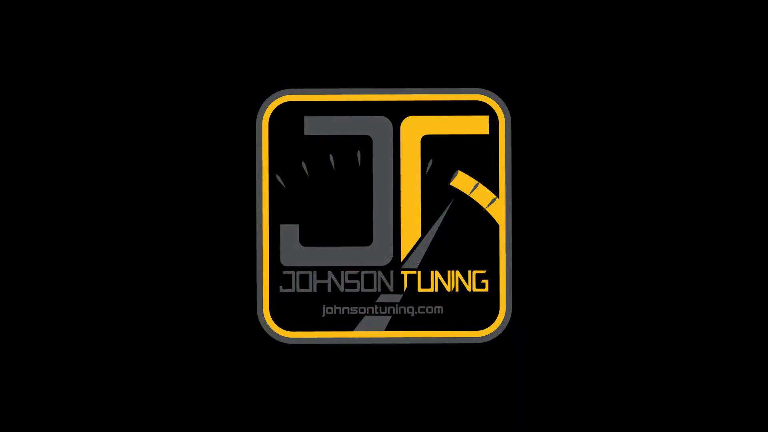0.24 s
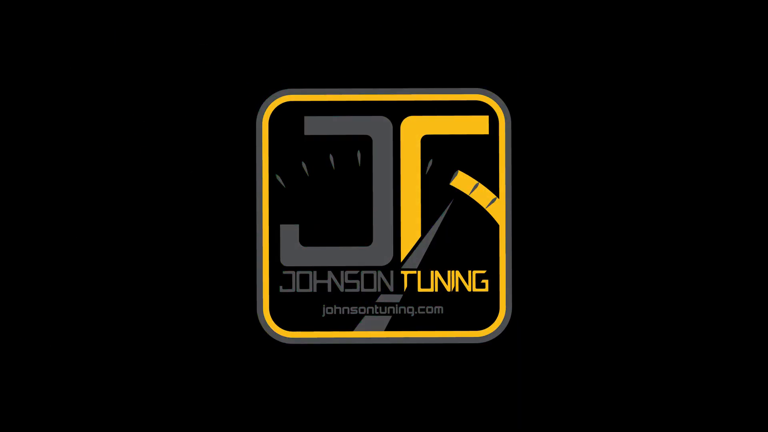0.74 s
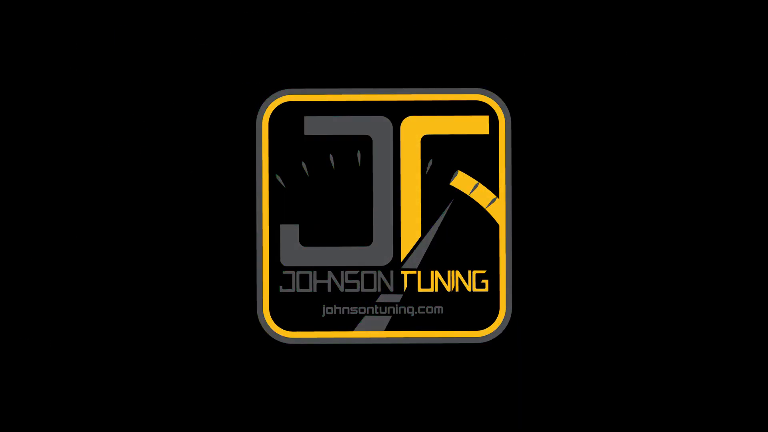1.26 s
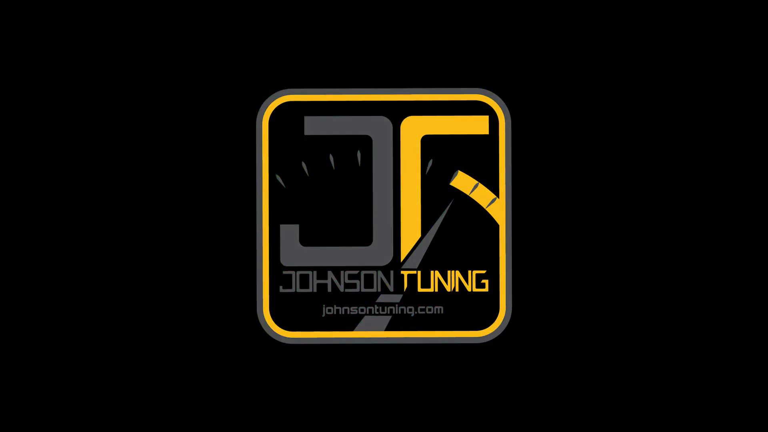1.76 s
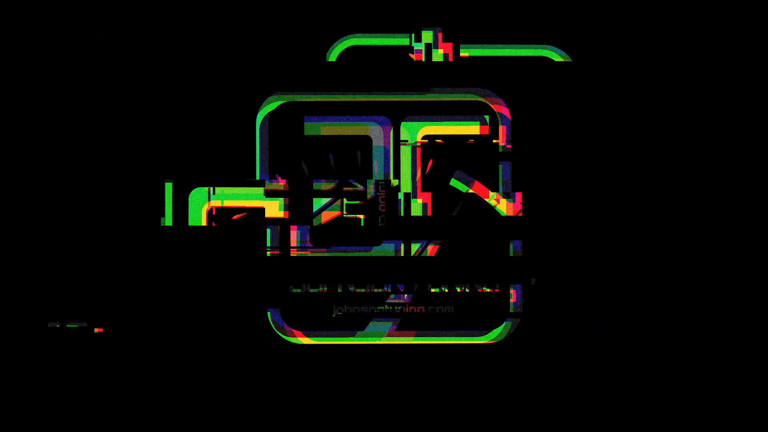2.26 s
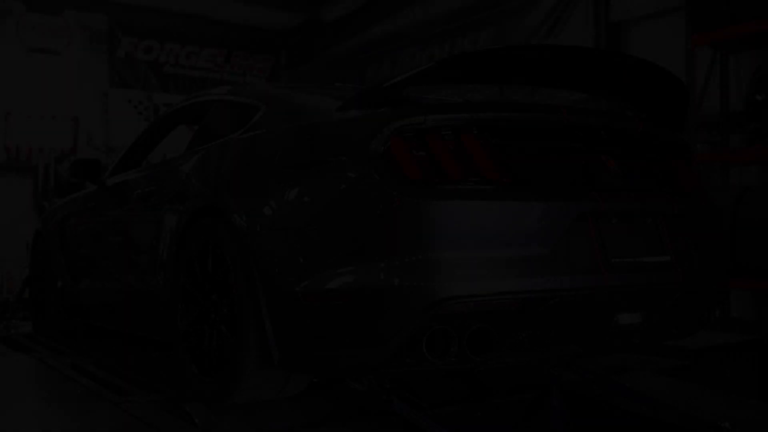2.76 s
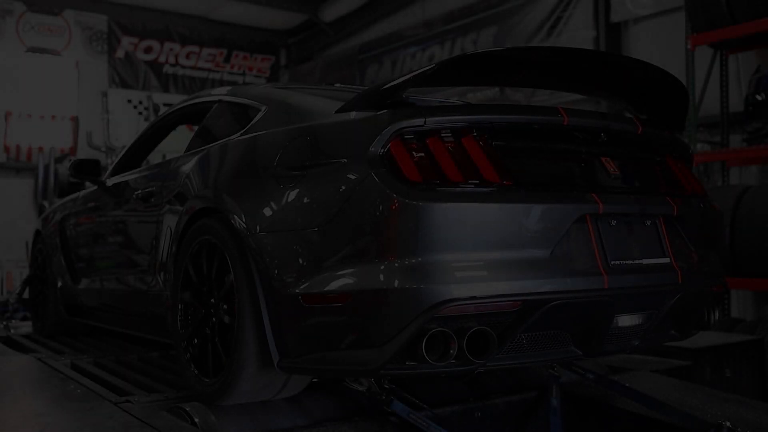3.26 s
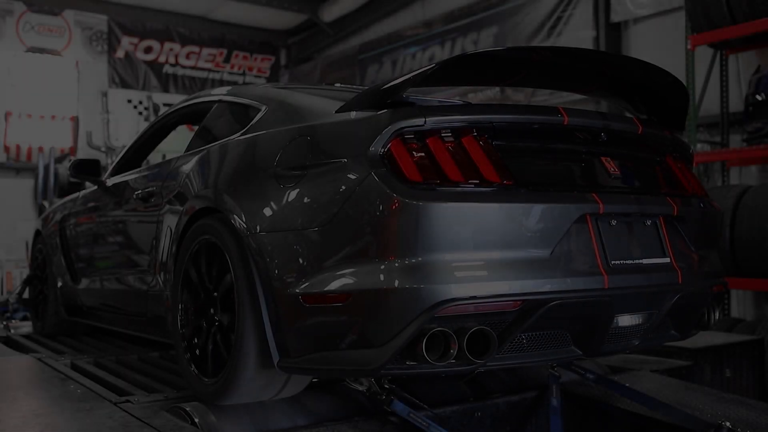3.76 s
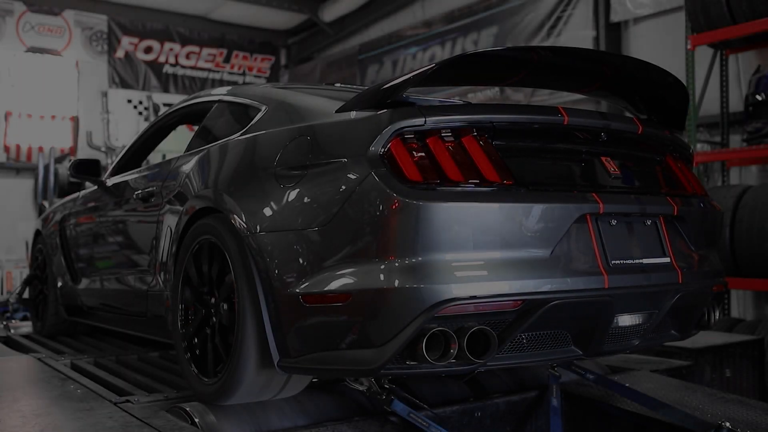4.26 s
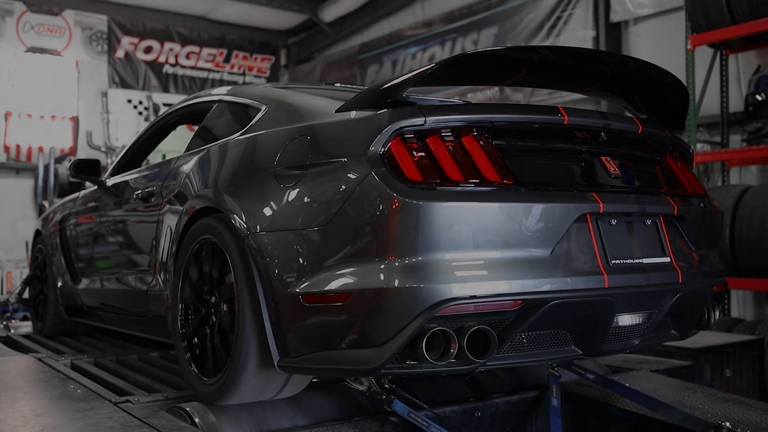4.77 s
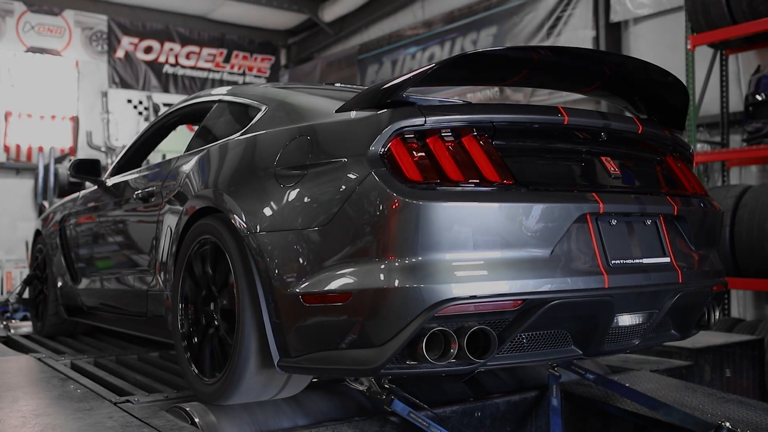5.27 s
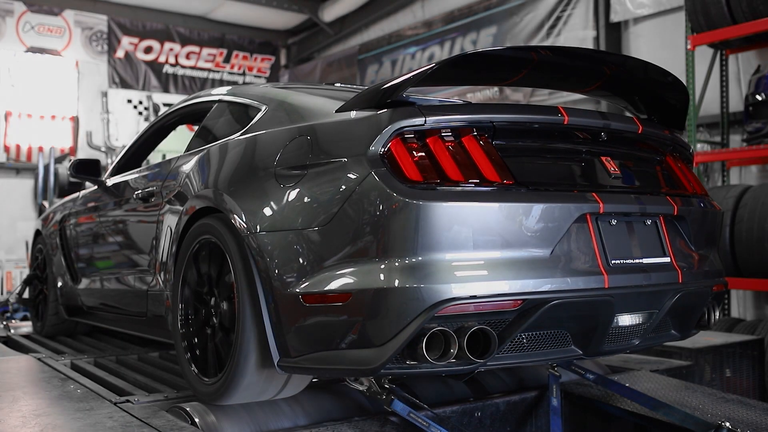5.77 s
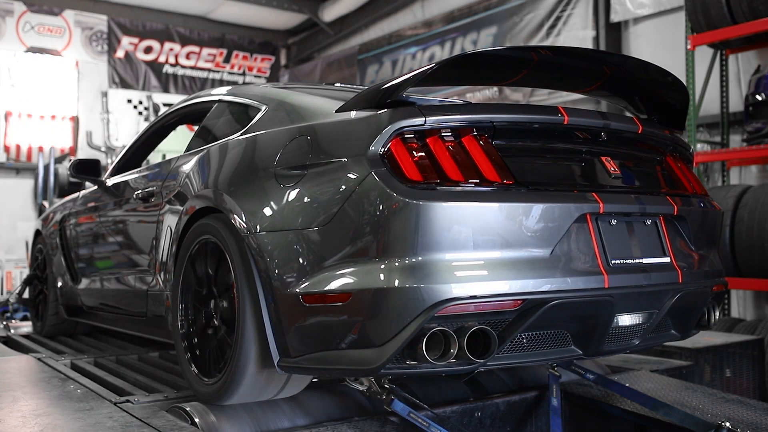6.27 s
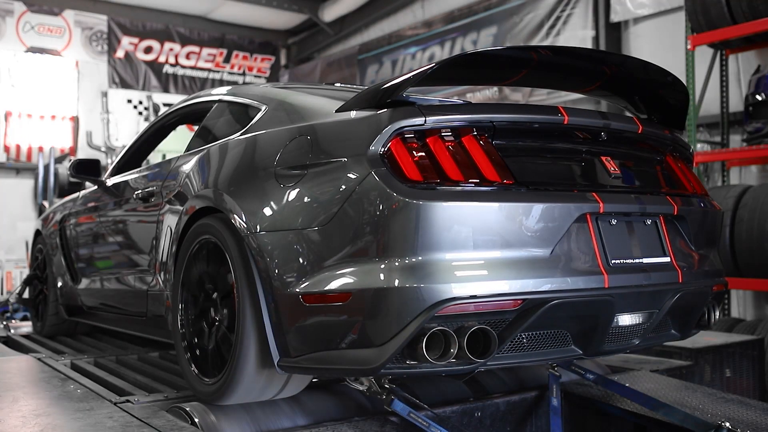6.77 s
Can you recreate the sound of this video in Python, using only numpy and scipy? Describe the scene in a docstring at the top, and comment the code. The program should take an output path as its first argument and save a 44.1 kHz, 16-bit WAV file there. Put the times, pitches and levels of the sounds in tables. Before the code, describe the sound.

In a workshop, one microphone sits behind the tailpipes of a turbocharged V8 car on rollers. Two quick idle chugs lead to a throttle blip and a steady, burbling light-throttle drone with turbo whine. The revs sag briefly, a breathy whistle rises, then full throttle brings a loud, rasping exhaust roar climbing continuously until the end.

```python
"""Turbocharged V8 on a chassis dynamometer

In a workshop, with one microphone behind the tailpipes: idle, a light-throttle roll, a full-throttle pull.
The exhaust sums partials on multiples of the engine cycle, swelling through resonances of pipes and workshop.
The turbo whines as a comb of close lines gliding through two resonances, and whistles as a gliding narrow
band of noise. The tailpipe gas is coloured noise that puffs at each firing. A few faint ticks come late.
"""
import sys
import numpy as np
from scipy import signal
from scipy.fft import rfft, irfft, next_fast_len
from scipy.io import wavfile

SR = 44100
rng = np.random.default_rng(int(sys.argv[2]) if len(sys.argv) > 2 else 0)


def wav_record(signal):
    """Record a signal, one row per channel, as 16-bit PCM in the file named by sys.argv[1]."""
    frames = np.transpose(np.atleast_2d(signal))
    bounded = np.clip(frames, -1, 1)
    # unit amplitude maps onto the largest positive 16-bit level
    quanta = np.round(bounded * 32767).astype(np.int16)
    wavfile.write(sys.argv[1], SR, quanta)


N = 309582
STEP = 8  # samples between points of the coarse grid
TIME = np.arange(N) / SR
COARSE = np.arange(N // STEP + 1) * STEP / SR  # s; the tonal layers need only a low sample rate
CRUISE_FIRINGS_PER_S = 99.7

# strength of the exhaust pulses, set by the throttle, before order levels and trims: time_s, effort_db
EFFORT = [(0.35, -46.5), (0.8, -39), (1.05, -42), (2.2, -45), (3.25, -41), (3.65, -39.0), (3.95, -34),
          (4.12, -31), (4.45, -33.5), (4.95, -30), (5.45, -26), (6.15, -29.5), (7.02, -31)]
# way through light throttle (0), full throttle (1) and top revs (2): time_s, state
ENGINE_STATE = [(3.6, 0.39), (4.1, 1.11), (4.9, 1.09), (5.9, 1.35), (6.5, 2)]
# unsteadiness of combustion: time_s, roughness (share 0-1)
ROUGHNESS = [(0, 0.7), (.5, 0.9), (1.0, 0.45), (3.2, 0.37), (3.8, .45), (4.2, 0.36), (5.0, 0.18),
             (7.0, 0.37)]
# relative strength of each cylinder's puff, in firing order: strength_db
CYLINDER_DB = [0.28, -0.5, 0.58, -0.36, 0.87, -0.73, 0.23, -0.83]
CYLINDERS = len(CYLINDER_DB)


def from_db(db):
    """Decibels to gain."""
    return np.exp(np.asarray(db) * np.log(10) / 20)


def rms_one(x):
    """Scale to rms 1."""
    return x / np.sqrt(np.mean(np.abs(x) ** 2) + 1e-20)


def in_time(rows, t):
    """Each column of a curve at the times t."""
    s, *columns = np.transpose(rows)
    return [np.interp(t, s, c) for c in columns]


def at_hz(points, hz):
    """Gain of a spectrum at the given frequencies, interpolated over log frequency."""
    f, db = np.transpose(points)
    return from_db(np.interp(np.log(hz + 1e-9), np.log(f), db))


def drift(corner_hz):
    """Complex noise on the coarse grid, low-passed by two equal poles at the corner, rms 1."""
    position = COARSE * corner_hz * 16  # 16 noise points per period of the corner
    pole = np.exp(-np.pi / 8)
    white = rng.standard_normal((2, 9000))
    slow = signal.lfilter([1], [1, -2 * pole, pole * pole], white[0] + 1j * white[1])
    slow = slow[50:]  # skip the filter's start
    return np.interp(position, np.arange(len(slow)), rms_one(slow))


def line(turns, rough, flutter_hz, scatter=1):
    """A partial fluttering by the share rough; its starting phase is scattered by up to scatter turns."""
    phase = (turns + scatter * rng.random()) % 1
    angle = (2 * np.pi * phase).astype(np.float32)
    flutter = rough * drift(flutter_hz)
    partial = (1 + flutter.real) * np.cos(angle) + flutter.imag * np.sin(angle)
    return partial / np.sqrt(1 + rough ** 2)  # same mean power whatever the flutter


def coloured(x, spectrum, band):
    """Colour x, silent below half the spectrum's lowest frequency and above its highest; rms 1 in the band."""
    size = next_fast_len(N, real=True)
    hz = np.arange(size // 2 + 1) * SR / size
    audible = (hz > spectrum[0][0] / 2) * (hz < spectrum[-1][0])
    shaped = rfft(x, size) * at_hz(spectrum, hz) * audible
    in_band = shaped[(hz > band[0]) & (hz < band[1])]
    band_rms = np.sqrt(2 * np.sum(np.abs(in_band) ** 2)) / size
    return irfft(shaped, size)[:N] / band_rms


def crank(t):
    """Cycle rate in Hz and cycles completed; all eight cylinders fire once a cycle."""
    # engine speed, from idle through a light roll to the climb: time_s, firings_per_s
    firing_rate = [(0, 62), (0.4, 60.5), (0.62, 88), (0.78, 100), (1.13, 107.8), (1.45, 104.7), (1.65, 109),
                   (1.9, 108.3), (2.1, 110.8), (2.5, 103.7), (2.85, 99.8), (3.17, 101.8), (3.65, 86.5),
                   (4.15, 126.3), (4.6, 152), (6, 227.6), (6.55, 255.8), (7.02, 275.8)]
    cycle_hz = in_time(firing_rate, t)[0] / CYLINDERS
    return cycle_hz, np.cumsum(cycle_hz) * (t[1] - t[0])


def pipe_gain(hz):
    """Resonances of pipes, silencers and workshop, added in power over an even floor."""
    # the resonances: centre_hz, width_hz, gain_db
    resonances = [(100.5, 48, -10), (131.6, 8.8, -4.5), (170.2, 25.0, 3), (192.7, 9.8, -1.8),
                  (218.4, 16, 2.5), (271.0, 63, 7), (297, 23, 6.5), (357.6, 56, 10), (438, 57, 10),
                  (479, 28, 7.5), (572.0, 39, 4), (669.0, 113, 4.5), (778.3, 23, 9), (833.0, 153, 4.5)]
    valley_db = -14.5  # what passes between the resonances
    power = from_db(valley_db) ** 2
    for centre_hz, width_hz, gain_db in resonances:
        gain = from_db(gain_db) / (1 + (2 * (hz - centre_hz) / width_hz) ** 2)
        power = power + gain ** 2
    return np.sqrt(power)


def exhaust_note(note_rough=0.6, harmonic_rough=0.78, flutter_hz=9.0, note_db=0.85, burble_db=-0.5,
                 note_steadiness=0.45):
    """The firing note, its harmonics and the burble of unequal cylinders sweep through the pipe resonances."""
    # engine orders, before effort, pipes and trims:
    # order (multiple of the cycle rate), light_throttle_db, full_throttle_db, top_revs_db
    order_levels = [(4, -19, 2.5, 6.5), (6, -8, -2, 10), (7, 7, 3, 8.5), (8, 31, 17.0, 0.5),
                    (9, 6, 0.5, -2), (10, 3.5, -2.5, -10), (11, 1.5, -18, 8.5), (12, -5, 0.5, 2.5),
                    (13, -2.5, 1, 0.5), (14, -0.5, -2, 1.5), (15, -1, -5.5, 4.5), (16, -5, 10, 7.5),
                    (17, -11, -3.5, 3), (18, -6, 0.5, 2.5), (19, -16, -15.5, 1.5), (20, -3, 0.5, 5.5),
                    (21, 4.5, -6, 5.5), (22, -3, -8, 0), (23, -4, -1, 6.5), (24, 5.5, 5.5, 6),
                    (25, -3, -3, -7.5), (26, -2.5, -1.5, -9.5), (27, 7, -4.5, 6), (28, -14, -3.5, -6.5),
                    (29, -12, -15.5, 12.5), (30, -12.0, -6.5, 9.5), (31, -2.5, -6.5, 10),
                    (32, -2.5, -0.5, 12)]
    surge_s, surge_half_width_s, surge_db, surge_note_db = 4.1, 0.056, 7.5, -10
    lug_octave_db, lug_note_db = 29.0, -4.5  # per octave of engine speed below cruising

    cycle_hz, cycles = crank(COARSE)
    effort_db, state, rough = (in_time(curve, COARSE)[0] for curve in (EFFORT, ENGINE_STATE, ROUGHNESS))
    # crossfade between neighbouring states
    shares = np.array([np.clip(1 - abs(state - k), 0, 1) for k in range(len(order_levels[0]) - 1)])
    # on light throttle the firing note follows the effort less than the burble does
    mean_light_effort_db = np.average(effort_db, weights=shares[0])
    steady_db = note_steadiness * shares[0] * (mean_light_effort_db - effort_db)
    # as load comes on, the note's third harmonic briefly swells and the note itself dips
    surge = np.exp(-((COARSE - surge_s) / surge_half_width_s) ** 2)
    # below cruising speed the note's octave grows while the note thins
    lug_octaves = np.maximum(np.log2(CRUISE_FIRINGS_PER_S / (cycle_hz * CYLINDERS)), 0)
    harmonic_db = {2: lug_octave_db * lug_octaves, 3: surge_db * surge}

    out = 0
    for order, *state_db in order_levels:
        order = round(order)
        gain = from_db(effort_db + np.dot(state_db, shares)) * pipe_gain(order * cycle_hz)
        turns = order * cycles
        if order == CYLINDERS:
            level_db = note_db + steady_db + surge_note_db * surge + lug_note_db * lug_octaves
            partial = line(turns, note_rough * rough ** 2, flutter_hz)
        elif order % CYLINDERS == 0:
            level_db = harmonic_db.get(order // CYLINDERS, 0)
            partial = line(turns, harmonic_rough * rough, flutter_hz)
        else:
            # pipes and walls delay each order differently, which smears the beat over the whole cycle
            lag_turns = order ** 2 / (2 * CYLINDERS + 1)
            level_db = burble_db
            partial = line(turns - lag_turns, rough, flutter_hz, scatter=0.34)
        out = out + gain * from_db(level_db) * partial
    return out


def exhaust_bark(bark_db=-8.0, scatter_db=4.5, rough_hz=420, flutter_hz=10.0, howl_centre=76.0,
                 howl_width=12.0):
    """Steep pulse fronts give a comb of high orders, louder with effort and revs, rougher the higher they lie."""
    # colour of the high orders: frequency_hz, gain_db
    bark_colour = [(230, 2), (350, 12), (450, 3.5), (520, -5.5), (780, -2), (1020, -10.5), (1230, -8),
                   (1420, -21.5), (1700, -16.5), (1900, -29.5), (2300, -12), (2750, -13)]
    # lift of a cluster of orders that climbs with the engine: time_s, lift_db
    howl = [(4.6, -3), (5.5, 5.5), (7.0, 1.5)]
    steepening_db = 9.5  # per octave of engine speed, zero at cruising

    cycle_hz, cycles = crank(COARSE)
    rough = in_time(ROUGHNESS, COARSE)[0]
    howl_db = in_time(howl, COARSE)[0]
    out = 0
    for order in range(33, 80):
        hz = order * cycle_hz
        lift_db = howl_db * np.exp(-((order - howl_centre) / howl_width) ** 2)
        # each order swells and sinks slowly by chance; the root of two gives the real part rms 1
        swell_db = scatter_db * drift(1.5).real * np.sqrt(2)
        gain = at_hz(bark_colour, hz) * from_db(lift_db + swell_db)
        out = out + gain * line(order * cycles, rough * hz / rough_hz, flutter_hz)
    octaves = np.log2(cycle_hz * CYLINDERS / CRUISE_FIRINGS_PER_S)
    return out * from_db(in_time(EFFORT, COARSE)[0] + steepening_db * octaves + bark_db)


def turbo_whine(whine_trim_db=1.0, rough=0.44, flutter_hz=6.0):
    """Turbo whine: a comb of closely spaced lines gliding through two resonances."""
    # spacing of the comb's lines: time_s, spacing_hz
    line_spacing = [(0, 49.87), (1.05, 54.53), (1.7, 52.5), (2.4, 48.96), (2.8, 49.43), (3.7, 58.2),
                    (4.4, 60.4), (4.9, 59)]
    # whine in the two resonances, before trim: time_s, low_db, high_db
    whine = [(0, -47.5, -65), (.5, -40, -49), (.82, -37, -35), (1.15, -42, -39.5), (1.6, -38, -35.5),
             (2.4, -40.5, -43.5), (2.95, -35.5, -36.5), (3.6, -53, -36.5), (4.7, -60, -34), (5.2, -60, -53)]
    # the two resonances, low then high: centre_hz, width_hz
    whine_resonances = [(1340, 220), (1650, 133)]

    spacing_hz = in_time(line_spacing, COARSE)[0]
    turns = np.cumsum(spacing_hz) * STEP / SR
    multiples = np.arange(21, 36)
    out = 0
    for (centre_hz, width_hz), level_db in zip(whine_resonances, in_time(whine, COARSE)):
        offset = 2 * (multiples[:, None] * spacing_hz - centre_hz) / width_hz
        gains = 1 / (1 + offset ** 4)
        comb = sum(g * line(k * turns, rough, flutter_hz) for k, g in zip(multiples, gains))
        out = out + rms_one(comb) * from_db(level_db + whine_trim_db)
    return out


def turbo_whistle(corner_hz=76.0):
    """Breathy whistle of the spooling turbo: slow noise shifted up to a gliding pitch."""
    # the whistle: time_s, pitch_hz, level_db
    whistle = [(.55, 1330, -41), (.88, 1488, -31.5), (1.7, 1410, -53), (2.6, 1323, -42), (2.85, 1354, -38),
               (3.6, 1681, -29.5), (4.3, 1880, -32), (5.6, 1950, -52)]
    pitch_hz, level_db = in_time(whistle, COARSE)
    turns = np.cumsum(pitch_hz) * STEP / SR
    rush = drift(corner_hz) * np.exp(2j * np.pi * turns)
    return rms_one(rush.real) * from_db(level_db)


def puffs(depth_db, scatter_db):
    """Noise that swells at each firing, its strength varying by cylinder and by chance."""
    firings = crank(TIME)[1] * CYLINDERS
    index = firings.astype(int)
    chance_db = scatter_db * rng.standard_normal(N)[index]
    strength_db = np.take(CYLINDER_DB, index, mode="wrap") + chance_db
    swell_db = depth_db * np.cos(2 * np.pi * firings)
    return rng.standard_normal(N) * from_db(strength_db + swell_db)


def gas_noise(light_db=0.6, loaded_db=-0.84, hiss_db=-0.2, fizz_db=-13.0):
    """Turbulent gas leaves the tailpipes: a rasp that changes colour with load, under hiss and fizz."""
    # gas levels before the trims above: time_s, rasp_db, hiss_db
    gas_levels = [(0, -43.5, -54.5), (.2, -43, -56.5), (.45, -39.5, -52), (.81, -33, -43.5),
                  (1.1, -38.5, -53), (2.3, -39.5, -54), (3.7, -32, -42), (3.86, -27, -42.5),
                  (4.5, -28.5, -46.5), (5.2, -28, -44), (5.55, -23.5, -42), (6.4, -21.5, -40),
                  (7.02, -21, -39)]
    # rasp colour on light throttle: frequency_hz, gain_db
    rasp_light = [(40, -35), (65, 1), (130, 4), (190, -0.5), (400, 4), (550, -8.5), (680, -5.5), (900, 1),
                  (1120, -7), (1350, 2), (1700, 1), (2000, 0), (2600, -2), (3150, -5), (3600, -20.5),
                  (4500, -19)]
    # rasp colour under load: frequency_hz, gain_db
    rasp_loaded = [(40, -25.5), (120, -5.5), (400, -3), (900, 0), (1250, -1.5), (1480, -7.5), (1750, -2.5),
                   (2300, 5), (2650, -1.5), (3100, -7), (3600, -11), (4600, -38)]
    # hiss colour: frequency_hz, gain_db
    hiss_colour = [(2800, -16), (3400, 0), (3950, -3.5), (4500, 2), (5200, -5.5), (5800, -5), (6500, -11.5),
                   (7500, -14.5), (9500, -34), (12000, -51)]
    # fizz colour: frequency_hz, gain_db
    fizz_colour = [(6200, -27.5), (7500, -2), (8400, 0), (10000, -5), (11500, -5), (13000, -9),
                   (15000, -13.5), (15800, -13)]
    rasp_band, hiss_band, fizz_band = (1900, 3500), (4000, 7000), (8000, 15000)  # Hz, where rms is set
    light_load = 0.29  # power share of the loaded rasp at state 0

    rasp_level_db, hiss_level_db = in_time(gas_levels, TIME)
    load = np.clip(in_time(ENGINE_STATE, TIME)[0], 0, 1)
    load = light_load + (1 - light_load) * load
    light = coloured(puffs(depth_db=-0.5, scatter_db=0.5), rasp_light, rasp_band) * from_db(light_db)
    loaded = coloured(puffs(depth_db=2.5, scatter_db=0.87), rasp_loaded, rasp_band) * from_db(loaded_db)
    hiss = coloured(puffs(depth_db=0.6, scatter_db=0.97), hiss_colour, hiss_band) * from_db(hiss_db)
    fizz = coloured(puffs(depth_db=1.0, scatter_db=1.5), fizz_colour, fizz_band) * from_db(fizz_db)
    # equal-power crossfade of the two rasps
    rasp = np.sqrt(np.clip(1 - load, 0, 1)) * light + np.sqrt(np.clip(load, 0, 1)) * loaded
    return from_db(rasp_level_db) * rasp + from_db(hiss_level_db) * (hiss + fizz)


def chug(t):
    """Level swell of the chugging idle in dB: quick attack, hold, slower release."""
    # chugs before the throttle opens: start_s, length_s (attack and hold), swell_db
    chugs = [(0.023, 0.063, 5.5), (.149, .084, 5.5)]
    attack_s, release_s = 0.006, 0.028
    swell_db = 0
    for start_s, length_s, peak_db in chugs:
        rise = (t - start_s) / attack_s
        fall = 1 - (t - start_s - length_s) / release_s
        swell_db = swell_db + peak_db * np.clip(np.minimum(rise, fall), 0, 1)
    return swell_db


def ticks():
    """Faint sharp ticks: decaying bursts of noise, thinned below the treble."""
    # ticks, level before the high-pass: start_s, peak_db
    tick_rows = [(5.423, -28), (5.463, -30), (5.839, -36), (6.445, -29)]
    decay_s, low_cut_hz = 0.0017, 4000
    envelope = 0
    for start_s, peak_db in tick_rows:
        decay = np.exp(-np.abs(TIME - start_s) / decay_s)
        envelope = envelope + from_db(peak_db) * (TIME >= start_s) * decay
    bright = signal.butter(1, low_cut_hz, "high", fs=SR, output="sos")
    # the tiny offset keeps the filter's input from being exactly zero
    return signal.sosfilt(bright, envelope * rng.uniform(-0.88, 1, N) + 1e-18)


def scene():
    """Exhaust tones, turbo, gas noise and ticks at one microphone."""
    tones = exhaust_note() + exhaust_bark() + turbo_whine() + turbo_whistle()
    tones = signal.resample_poly(tones, STEP, 1, window=("kaiser", 11))[:N]
    engine = (tones + gas_noise()) * from_db(chug(TIME))
    return (engine + ticks())[None]


def record(dry):
    """The recorder flattens any peak beyond full scale, and a steep low-pass cuts the top."""
    clipped = np.clip(dry, -1, 1)
    cutoff_hz = 15800
    low_pass = signal.ellip(10, .1, 80, cutoff_hz, fs=SR, output="sos")
    return signal.sosfilt(low_pass, clipped)


dry = scene()
out = record(dry)
wav_record(out)
```